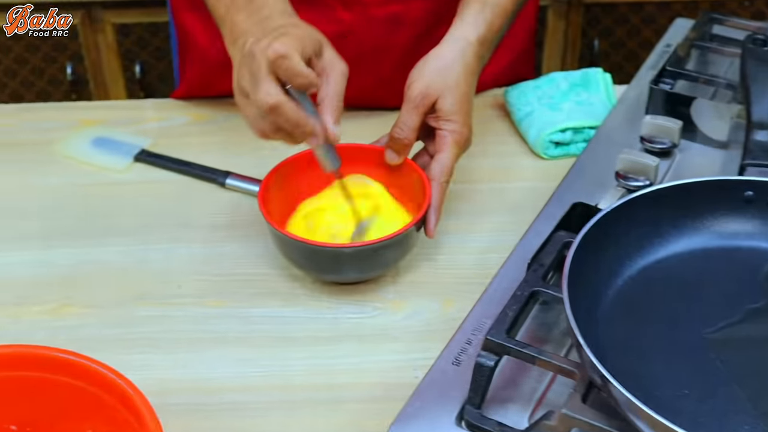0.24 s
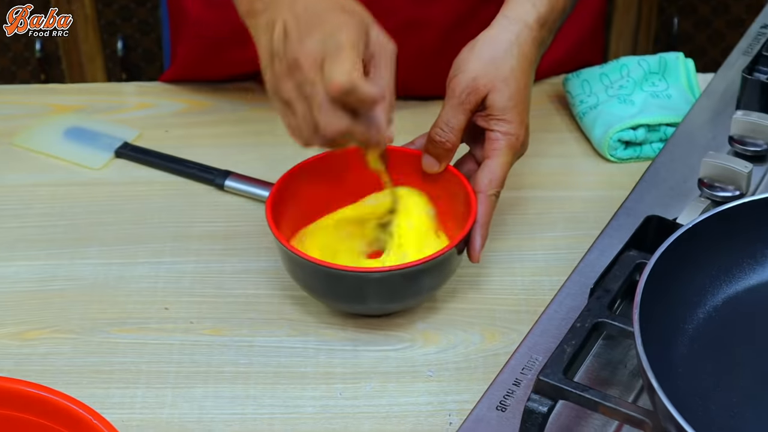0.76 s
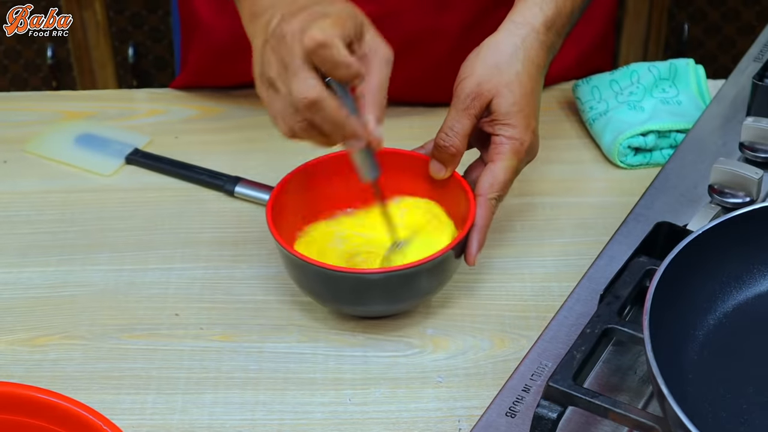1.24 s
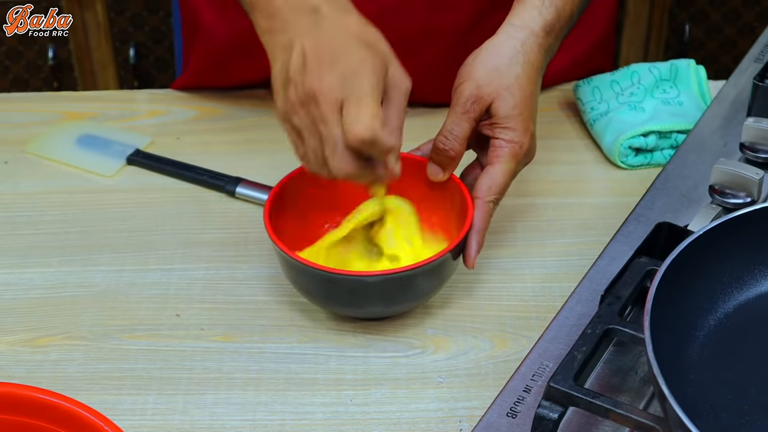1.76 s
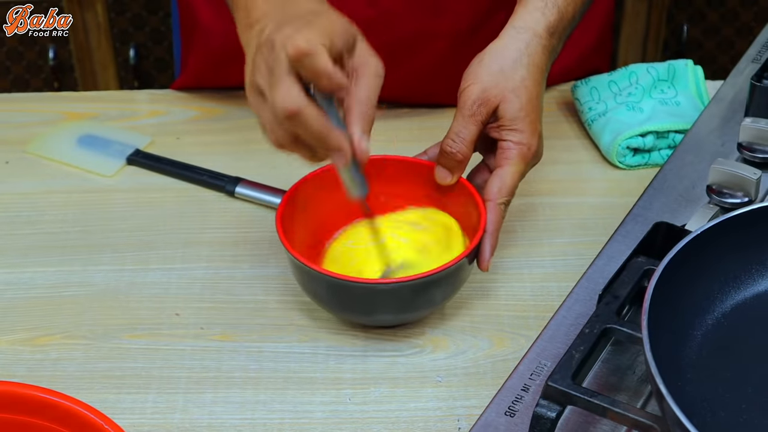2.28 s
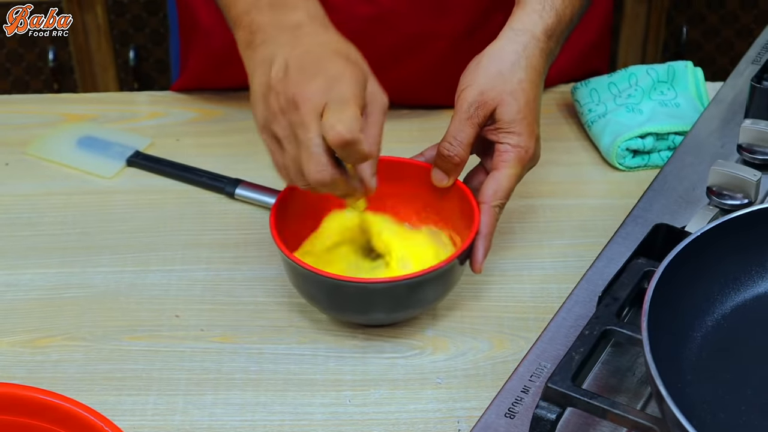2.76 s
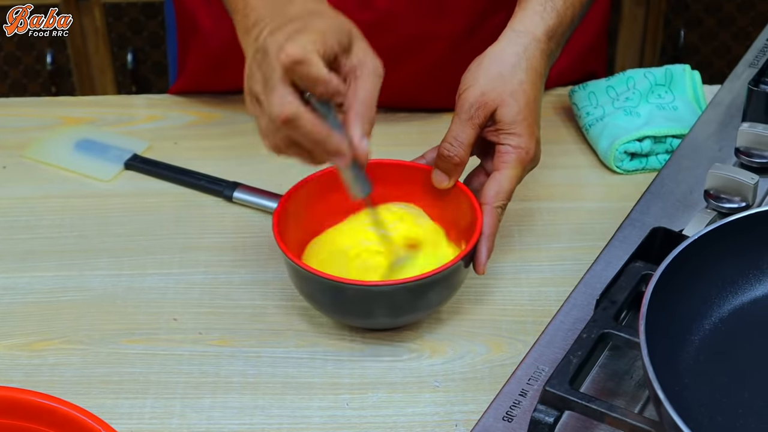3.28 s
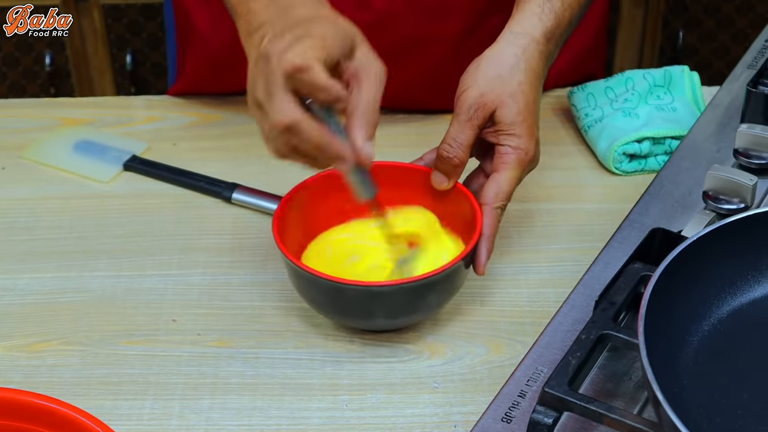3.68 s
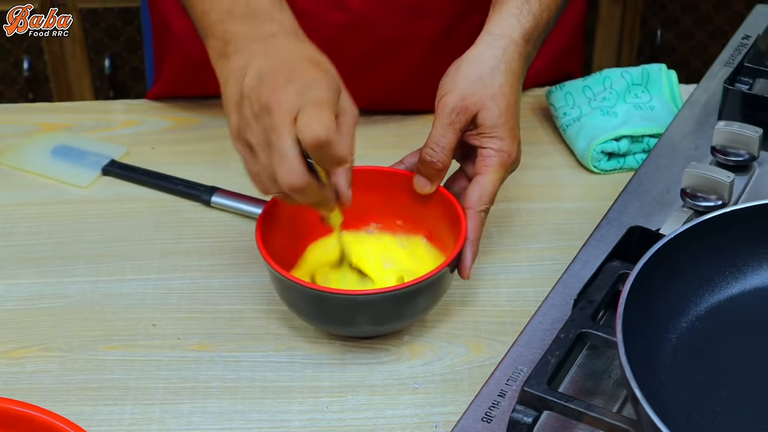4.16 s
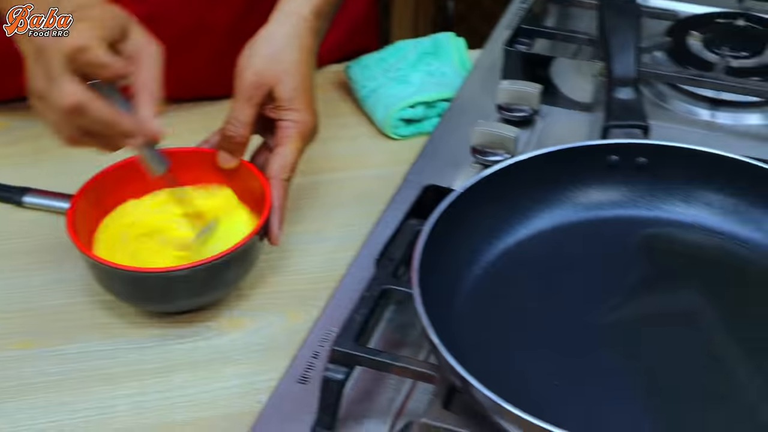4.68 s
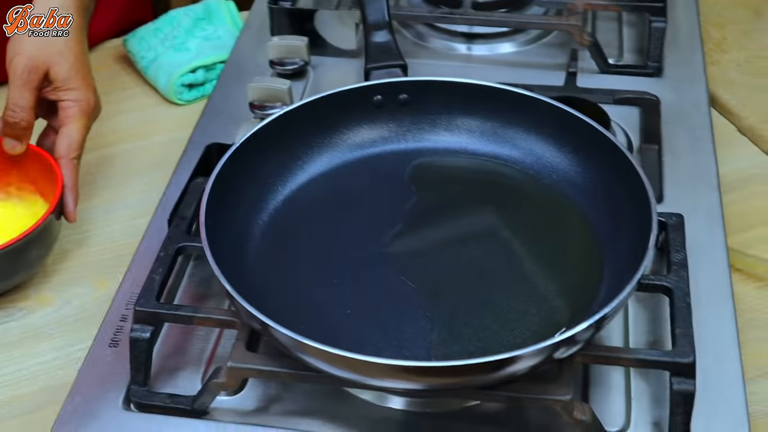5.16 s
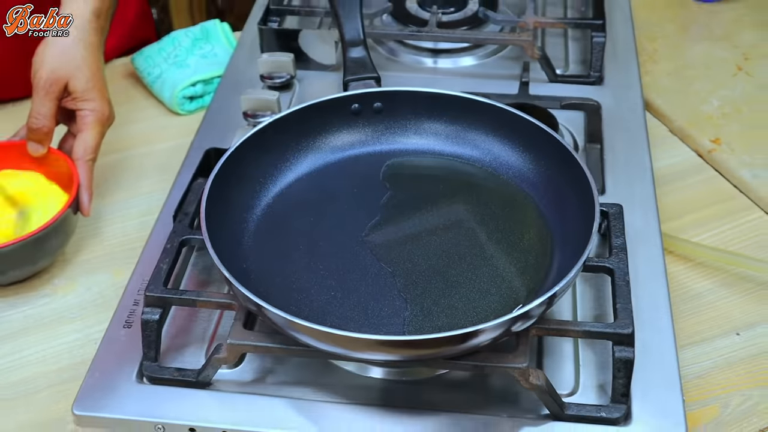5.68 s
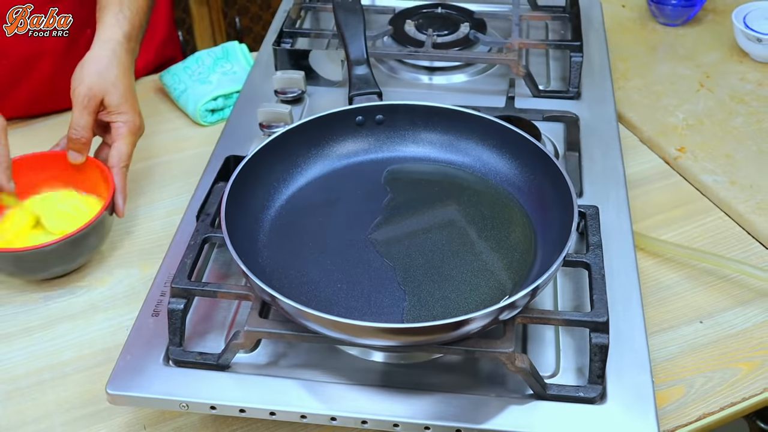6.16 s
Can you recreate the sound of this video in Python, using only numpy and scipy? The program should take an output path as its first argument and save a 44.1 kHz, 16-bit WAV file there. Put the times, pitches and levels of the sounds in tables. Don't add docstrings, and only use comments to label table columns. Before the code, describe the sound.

Close, rapid whisking of egg: bright clacking knocks on a small bowl, scratchy scrapes and wet sloshing between them, in a small hard kitchen.

```python
import sys
import numpy as np
from scipy import signal
from scipy.fft import rfft, irfft
from scipy.io import wavfile
from scipy.ndimage import uniform_filter1d

SR = 44100
rng = np.random.default_rng(int(sys.argv[2]) if len(sys.argv) > 2 else 0)


def gain_from_db(level_db):
    decades = np.asarray(level_db, float) / 20
    return 10 ** decades


def to_wav(s):
    ch = np.atleast_2d(s).T
    pcm = np.round(np.clip(ch, -1, 1) * 32767)
    wavfile.write(sys.argv[1], SR, pcm.astype(np.int16))


N = 283122

# time in seconds, hiss at full speed in dB, hiss at the turn in dB,
# lead of the turn ahead of the blow in seconds.
WRIST = [(0, -26.5, -34, .065), (.22, -24.5, -39, 0.048), (.42, -27, -36.5, 0.063), (1.02, -29, -35, 0.045),
         (1.6, -28, -35.5, 0.017), (1.83, -32.5, -34, 0.051), (2.03, -29.5, -32, 0.039),
         (2.45, -28, -37, 0.061), (2.85, -28, -34.5, 0.061), (3.06, -29.5, -37, 0.087),
         (4.06, -28, -38, 0.079), (4.3, -27, -38, 0.049), (4.87, -29.5, -41, 0.082),
         (5.27, -34.5, -41.5, 0.089), (5.67, -32.5, -39.5, 0.043), (5.86, -34, -40, 0.04),
         (6.26, -29, -38.5, 0.033), (6.47, -23, -39.5, 0.063)]
# frequency in Hz, level in dB.
HISS = [(2500, -5.5), (4000, -2.5), (5000, 0.5), (8500, -3.5), (10000, -11), (13000, -14), (16000, -18)]
# frequency in Hz, level in dB.
GRIND = [(900, 1.5), (1500, -9.5), (2200, 1), (3000, 9.5), (4300, -12), (6000, -10)]
# frequency in Hz, level in dB.
SLOSH = [(90, -40), (200, 6), (300, 5), (500, 1), (750, 0), (1100, 1.5), (1600, -12), (2600, -63)]
# frequency in Hz, width in Hz, level in dB.
SPOON_MODES = [(4970, 300, -3), (6230, 200, -5), (8200, 300, -5)]
# frequency in Hz, width in Hz, level in dB.
BOWL_MODES = [(1270, 60, -57), (1470, 4.3, -95), (1742, 61, 5.5), (2160, 70, -30), (3420, 36, -22)]
# frequency in Hz, width in Hz, level in dB.
CAVITY_MODES = [(549, 30, -2.5), (771, 66, 2.5), (1036, 110, -8)]
# landing in seconds, depth of the lull in dB.
LIFTS = [(.167, 13), (.365, 2.5), (.772, 5.5), (.963, 8), (2.16, 7), (2.582, 8), (2.773, 6), (3.195, 3),
         (3.601, 1), (4.0, 1.5), (4.203, 11), (4.405, 12), (4.61, 0), (4.806, -5.5), (5.19, 0), (5.8, 2),
         (6.202, 2), (6.4, 12.5)]
# start in seconds, crack peak in dB, clack pitch in
# Hz, clack level relative to the crack in dB, grind of the edge swinging in, in dB.
STROKE_ROWS = [(0.0133, -4, 1470, -7, -30), (0.2178, -4.5, 1320, -5, -28), (0.4207, -8, 1670, -19, -46),
               (0.6182, -8, 1570, -4.5, -42), (0.8212, -7, 1660, -7.5, -36),
               (1.0225, -3.5, 2370, -6.5, -28), (1.2211, -6, 1900, -22, -37),
               (1.4217, -4.5, 2500, -16, -42), (1.6253, -2, 2860, -10.5, -32),
               (1.8263, -4.5, 1380, -7.5, -43), (2.033, -7, 1470, -8.5, -35.5),
               (2.2341, -1, 1480, -11.5, -28), (2.4471, -8.5, 1910, -9.5, -42),
               (2.65, -4.5, 1540, -10.5, -33), (2.8558, -4.5, 1800, -5.5, -57),
               (3.0631, -1.5, 2850, -14, -43),
               (3.2623, -4, 2630, -8.5, -37), (3.459, -1, 1720, -11.5, -42), (3.6615, -6, 2430, -10, -33),
                 (3.8588, -5, 1750, -13, -29), (4.0644, -3.5, 2160, -6, -32), (4.2707, -4, 1940, -16, -30),
                 (4.4723, -1.5, 2360, -7.5, -30), (4.6719, -3.5, 1416, -8.5, -31.5),
                 (4.8652, -3, 2830, -10, -32.5), (5.0665, -4, 3030, -11, -34), (5.267, -8.5, 2220, -6, -42),
                 (5.464, -6.5, 2060, -5, -35), (5.665, -9.5, 3140, -5.5, -39), (5.863, -4, 2310, -11, -44),
                 (6.0623, -5.5, 3340, -20, -31.5), (6.2626, -5.5, 3240, -14, -39)]
STROKES = STROKE_ROWS
# frequency in Hz, level in dB.
CRACK = [(2500, -7), (4000, 2), (6500, -5.5), (8400, -1.5), (10000, -14.5), (12500, -9), (15500, -15),
         (17000, -60)]
# air pocket peak in dB, pocket pitch in
# Hz, slosh ahead of the spoon in dB, weight on the worktop in dB.
SLAP_ROWS = [(-6, 540, -37, 2.5), (-2.5, 664, -41, -3), (-8, 696, -46, -2.5), (-10, 550, -47, 3),
             (-14, 1190, -35, -2.3), (-7.5, 720, -48, -3), (-4, 767, -32.5, 4.5), (-9, 974, -34, -7.5),
             (-5, 714, -32, -2.5), (-7.5, 530, -42, 4), (-14.5, 1220, -35.5, -3.5), (-3, 650, -44, 3.5),
             (-6.5, 536, -39.5, 2), (-12.5, 600, -45, 2), (-13, 930, -43, -4), (-7, 710, -41, -2.5),
             (-16.5, 540, -34.5, -2.5), (-14, 810, -32.5, -6), (-13, 740, -56, 0.5),
               (-7.5, 660, -33, 6.5), (-13.5, 1050, -36, -0.5), (-4.5, 724, -60, -1.5), (-7, 840, -38, 0),
               (-4, 750, -42, -5.5), (-8, 770, -43, -2), (-5.5, 794, -42, -2.5), (-21, 440, -46, 0),
               (-21.5, 510, -40, -0.3), (-4, 676, -45, 3), (-12, 1170, -43.5, 2.5), (-8.5, 606, -31, 4.5),
               (-9.5, 560, -28.5, 3.5)]
SLAPS = SLAP_ROWS
# start in seconds, peak in dB, pocket pitch in Hz.
EARLY_SLAPS = [
    (2.221, -23, 590),
    (2.837, -15, 540),
    (3.636, -13.5, 594),
]
# frequency in Hz, width in Hz, level in dB.
LOW_ROOM_MODES = [(50, 4.7, -6), (69.6, 6.5, -1), (97.4, 5.2, 7.5), (121.7, 6.4, -1.5), (163, 4, -36),
                  (163.6, 5.6, 4.5)]
# frequency in Hz, width in Hz, level in dB.
ROOM_MODES = [(201.3, 5.4, 0), (231.2, 3.5, 1), (257, 11, -20), (297.2, 9.3, 5), (321, 6.1, 5),
              (341.4, 8.2, 2), (386, 31, -4), (408.5, 9, 2), (462, 32, 0.5), (492.6, 20, -0.5)]
# centre in Hz, time to fall 60 dB in seconds, level in dB.
REVERBERATION = [(547, 0.23, -15.5), (927, 0.3, -8.5), (2500, 0.34, -11), (5970, 0.059, -5),
                 (12600, 0.17, -3)]
# delay in seconds, level in dB.
ECHOES = [
    (.0072, -11),
    (0.0154, -11),
    (0.0245, -21.5),
]
# start in seconds, peak in dB, pitch in Hz,
# decay in seconds (half the time constant).
SQUEAKS = [(.195, -26, 4300, 0.0066), (.822, -13, 1670, .005), (2.857, -14, 1910, 0.0059),
           (1.024, -18.5, 2960, 0.0077), (1.185, -30.5, 2870, 0.0068), (2.208, -27, 3500, 0.0072),
           (2.235, -16, 1485, 0.02), (3.81, -24, 4950, 0.0051), (3.825, -26, 2950, .007),
           (4.008, -22, 5000, .012), (4.028, -27, 3070, .007), (4.067, -17, 2920, 0.011),
           (4.436, -29, 3050, 0.01), (4.625, -26, 4130, 0.007), (4.675, -18, 1506, .02),
           (4.677, -18, 3050, 0.014), (4.868, -26, 2850, 0.011)]
# start in seconds, peak in dB.
BUMPS = [
    (0.22, -33),
    (2.079, -30),
    (2.149, -38),
    (4.549, -53),
    (5.169, -37),
]
# start in seconds, peak in dB.
TOUCHES = [(0.7437, -36), (1.0037, -6), (2.074, -4.5), (2.632, -17), (2.69, -7), (2.7286, -28),
           (2.8355, -4), (3.6037, -32), (3.82, -22), (4.0058, -10), (4.0452, -11), (4.0995, -10),
           (4.61, -18), (4.8077, -18), (4.8465, -6), (5.0509, -14), (5.65, -13), (5.844, -7.5),
           (5.901, -23), (6.043, -7), (6.1736, -28), (6.2036, -17), (6.3, -1), (6.404, -10)]

FASTEST_S, STROKE_S = 0.008, 0.203
TURN_GRIND_DB, TURN_SLOSH_DB = -59.5, -43
TURN_GRIND_SLOPE = 2.4
THUMP_DB, THUMP_DB_PER_S = -24, -1.33


def colour(x, points):
    hz, db = np.transpose(points)
    f = np.maximum(np.arange(len(x) // 2 + 1) * SR / len(x), 1)
    gain = gain_from_db(np.interp(np.log(f), np.log(hz), db))
    y = irfft(rfft(x) * gain, len(x))
    return y / np.std(y)


def ring(x, modes):
    out = 0
    for k, (hz, width, db) in enumerate(modes):
        out = out + (-1) ** k * gain_from_db(db) * signal.lfilter(*signal.iirpeak(hz, hz / width, SR), x)
    return out


def band(x, lo_hz, hi_hz):
    y = signal.sosfilt(signal.butter(2, [lo_hz, hi_hz], "band", fs=SR, output="sos"), x)
    return y / np.abs(y).max()


def wander(values, hold):
    return uniform_filter1d(np.repeat(values, hold)[:N], hold)


def grains(rate, spread_db):
    hold = int(SR / rate)
    size = gain_from_db(spread_db * np.minimum(rng.exponential(size=N // hold + 1), 4))
    x = wander(size, hold) * rng.standard_normal(N)
    return x / np.std(x)


def add(track, s, sound):
    i = int(s * SR)
    track[i:i + len(sound)] += sound[:len(track) - i]


def swing():
    s, grind_db = np.array(STROKES)[:, [0, 4]].T
    s, grind_db = np.append(s, s[-1] + STROKE_S), np.append(grind_db, grind_db[-1])
    slosh_db = np.append(np.array(SLAPS)[:, 2], TURN_SLOSH_DB)
    wrist = np.array(WRIST).T
    fast_db, turn_db, lead_s = (np.interp(s, wrist[0], column) for column in wrist[1:])
    times = np.ravel([s - lead_s, s - FASTEST_S], "F")

    def gain(low_db, top_db):
        levels = np.ravel([low_db + 0 * s, top_db], "F")
        return gain_from_db(np.interp(np.arange(N) / SR, times, levels))

    turn_grind_db = TURN_GRIND_DB + TURN_GRIND_SLOPE * (turn_db - turn_db.mean())
    return gain(turn_db, fast_db), gain(turn_grind_db, grind_db), gain(TURN_SLOSH_DB, slosh_db)


def patchy(x, rate, patchy_db, speed):
    out, hold = 0, int(SR / rate)
    for n, hz in enumerate(1300 * 1.41 ** np.arange(8)):
        walk = wander(rng.standard_normal(N // hold + 1), hold)
        sos = signal.butter(1, [hz / 1.19, hz * 1.19], "band", fs=SR, output="sos")
        out = out + gain_from_db(patchy_db * walk) * speed ** (0.036 * n) * signal.sosfilt(sos, x)
    return out


def flecks():
    out = np.zeros(N)
    per_s, low_hz, octaves, glide = 260, 2260, 1.6, 0.18
    for when, pitch, size, length in rng.random((int(per_s * N / SR), 4)):
        hz = low_hz * 2 ** (octaves * pitch)
        cycles = 10 * (0.33 + 2 * length ** 2)
        turns = np.arange(int(4 * cycles * SR / hz)) * hz / SR
        age = turns / cycles
        chirp = np.sin(2 * np.pi * turns * (1 + glide * age / 8)) * age * np.exp(-2 * age)
        uneven_db = -4.0 * np.log(1 - 0.9 * size)
        add(out, when * N / SR, gain_from_db(uneven_db) * chirp)
    return out / np.std(out)


def lifts():
    t, db = np.arange(N) / SR, np.zeros(N)
    for s, depth_db in LIFTS:
        since = np.clip(t - s, -0.1, 0.1)
        db += depth_db * np.where(since < 0, -np.exp(since / 0.033), 0.61 * np.exp(-since / 0.016))
    return gain_from_db(db)


def drag():
    grit = grains(400, spread_db=2.0)
    hiss = colour(grit, HISS) + gain_from_db(5.0) * ring(grit, SPOON_MODES)
    grind = colour(grains(300, spread_db=3.0), GRIND)
    wet = colour(grains(120, spread_db=3.5), SLOSH)
    rumble_points = [(22, -25), (40, 9), (70, -6), (115, -4.0), (150, 3), (300, -26)]  # (Hz, dB)
    rumble = colour(rng.standard_normal(N), rumble_points)
    speed, bite, surge = swing()
    steel = gain_from_db(0.5) * speed * hiss + gain_from_db(3.0) * bite * (grind + ring(grind, BOWL_MODES))
    steel = patchy(steel, rate=25, patchy_db=2.6, speed=speed / gain_from_db(-38))
    steel = steel + gain_from_db(-4.5) * speed * flecks()
    egg = surge * (wet + ring(wet, CAVITY_MODES))
    return gain_from_db(-4.0) * lifts() * steel + gain_from_db(-0.5) * egg + gain_from_db(-56.5) * rumble


def strokes():
    out, t = np.zeros(N), np.arange(SR // 8) / SR
    contact = (1 - np.exp(-t / 0.0005)) ** 2 * np.exp(-t / 0.0014)
    skid = (1 - np.exp(-t / 0.0006)) ** 2 * (np.exp(-t / 0.0016) + 0.1 * np.exp(-t / 0.009))
    for s, db, hz, clack_db, _ in STROKES:
        noise = rng.standard_normal((4, len(t)))
        crack = colour(noise[0], CRACK) * skid
        wide = band(noise[1] * (contact + 0.13 * np.exp(-t / 0.013)), 1310, 2920)
        flex = np.sin(2 * np.pi * hz * t) * (1 - np.exp(-t / 0.0003)) * np.exp(-t / 0.0018)
        rattle = band(noise[2] * np.exp(-t / 0.015), 0.823 * hz, 1.267 * hz)
        clack = 1.31 * wide + 2.26 * flex + 0.48 * rattle
        rebound = colour(noise[3], HISS) * np.exp(-((t - 0.036) / 0.011) ** 2)
        blow = crack / np.abs(crack).max() + gain_from_db(clack_db) * clack
        add(out, s, gain_from_db(db + 0.5) * blow + gain_from_db(-27.5) * rebound)
    return out


def slaps():
    wet, push, boom = np.zeros(N), np.zeros(N), np.zeros(N)
    t = np.arange(SR // 8) / SR
    blows = [(stroke[0], db, hz, weight_db) for stroke, (db, hz, _, weight_db) in zip(STROKES, SLAPS)]
    for s, db, hz, weight_db in blows + [(*row, -5) for row in EARLY_SLAPS]:
        noise = rng.standard_normal((2, len(t)))
        pocket = np.sin(2 * np.pi * hz * (0.99 * t + 9 * t ** 2))
        pocket = pocket * (1 - np.exp(-t / 0.0004)) * np.exp(-t / 0.0021)
        froth = band(noise[0] * np.exp(-t / 0.0057), 0.57 * hz, 1.67 * hz)
        add(wet, s + 0.00035, gain_from_db(db - 2.0) * (1.33 * pocket + 0.86 * froth))
        shove = np.sin(2 * np.pi * 330 * t) * np.exp(-t / 0.0015)
        shudder = band(noise[1] * np.exp(-t / 0.028), 164, 633)
        add(push, s, gain_from_db(THUMP_DB + THUMP_DB_PER_S * s + weight_db) * (shove + 0.31 * shudder))
        add(boom, s, gain_from_db(-0.6 * s + 0.049 * db) * np.exp(-t / 0.0018))
    egg = wet + gain_from_db(4.5) * ring(wet, CAVITY_MODES)
    thump = gain_from_db(3.0) * push + gain_from_db(23.0) * ring(push, ROOM_MODES)
    return egg + thump + gain_from_db(-14.5) * ring(boom, LOW_ROOM_MODES)


def kitchen(x):
    t = np.arange(SR // 2) / SR
    tail = np.zeros(len(t))
    for hz, t60, db in REVERBERATION:
        fade = np.exp(-np.log(1000) * t / t60) * (1 - np.exp(-(t / 0.0013) ** 2))
        part = band(rng.standard_normal(len(t)), hz / 1.694, hz * 1.6) * fade
        tail += gain_from_db(db - 5.0) * part / np.sqrt(np.sum(part ** 2))
    for s, db in ECHOES:
        add(tail, s, gain_from_db(db) * signal.firwin(31, 3500, fs=SR))
    return x + signal.fftconvolve(x, tail)[:N]


def squeaks():
    out, t = np.zeros(N), np.arange(SR // 6) / SR
    for s, db, hz, swell_s in SQUEAKS:
        envelope = (1 - np.exp(-t / 0.003)) * np.exp(-t / swell_s / 2)
        swell = rng.standard_normal(len(t)) * envelope
        add(out, s, gain_from_db(db) * band(swell, hz * (1 - 0.075), hz * (1 + 0.075)))
    return out


def bumps():
    out, t = np.zeros(N), np.arange(SR // 8) / SR
    thud = np.sin(2 * np.pi * 60 * t) * t / 0.024 * np.exp(1 - t / 0.016)
    for s, db in BUMPS:
        add(out, s, gain_from_db(db) * thud)
    return out


def touches():
    out, t = np.zeros(N), np.arange(SR // 50) / SR
    for s, db in TOUCHES:
        burst = rng.standard_normal(len(t)) * t * np.exp(-t / 0.0013)
        add(out, s, gain_from_db(db - 9.5) * band(burst, 2200, 9800))
    return out


def scene():
    blows = strokes() + slaps()
    struck = blows + gain_from_db(-8.0) * ring(blows, BOWL_MODES) + touches()
    return (drag() + kitchen(struck) + squeaks() + bumps())[None]


def roll_off(x):
    return signal.sosfilt(signal.butter(12, 16640, fs=SR, output="sos"), x)


def record(dry):
    low_cut = signal.butter(3, 38, "high", fs=SR, output="sos")
    high_cut = signal.ellip(8, 0.2, 60, 15900, fs=SR, output="sos")
    heard = signal.sosfilt(low_cut, np.clip(dry, -1, 1))
    heard = signal.sosfilt(high_cut, heard)
    return roll_off(np.clip(heard, -1, 1))


dry = scene()
out = record(dry)
to_wav(out)
```